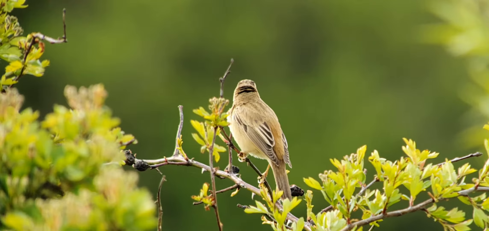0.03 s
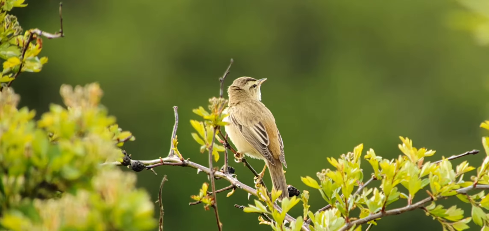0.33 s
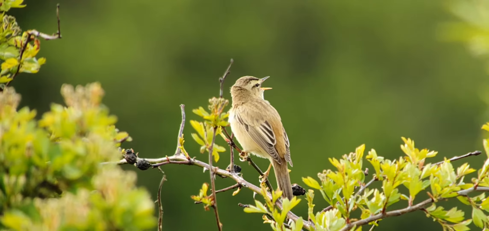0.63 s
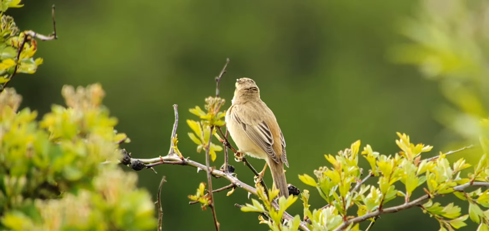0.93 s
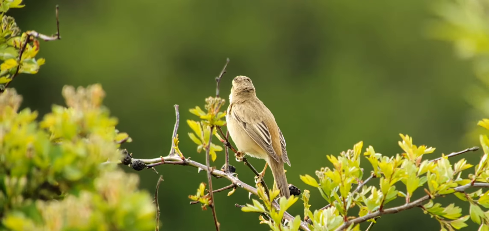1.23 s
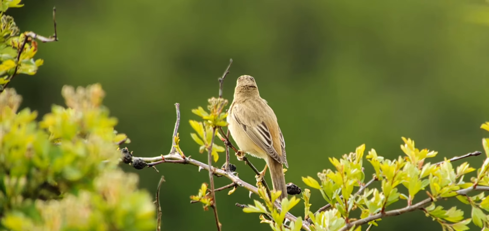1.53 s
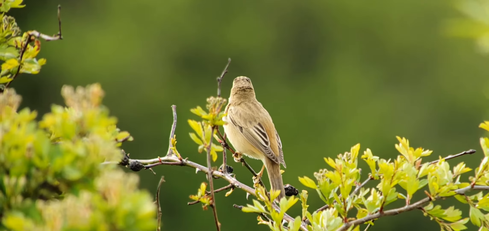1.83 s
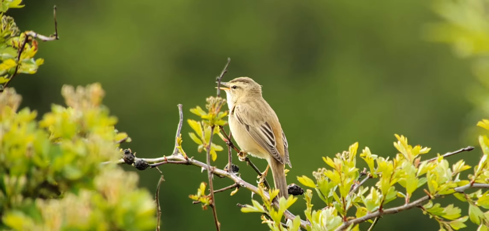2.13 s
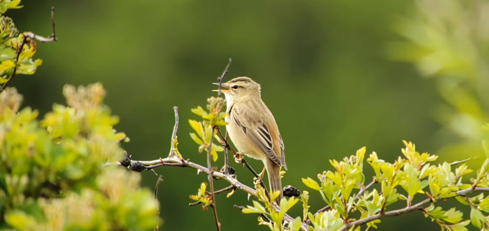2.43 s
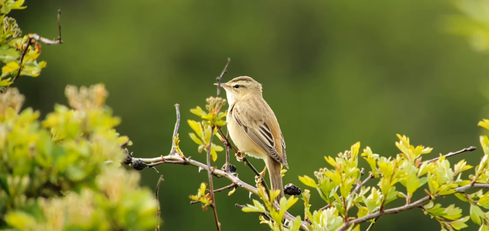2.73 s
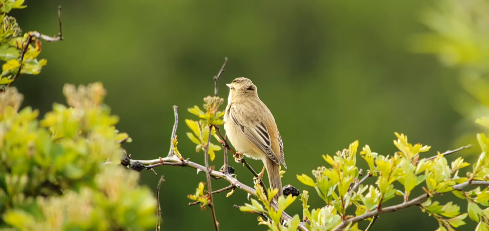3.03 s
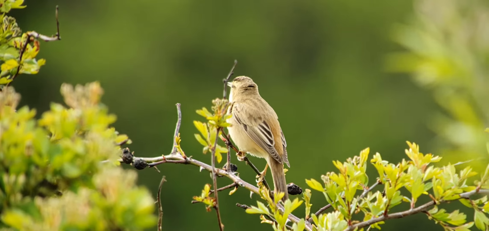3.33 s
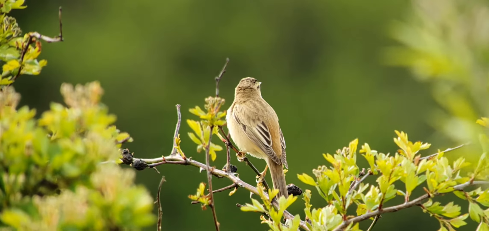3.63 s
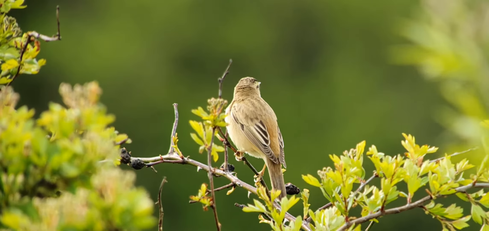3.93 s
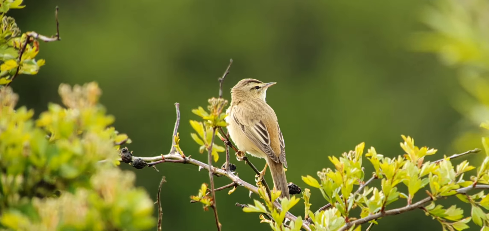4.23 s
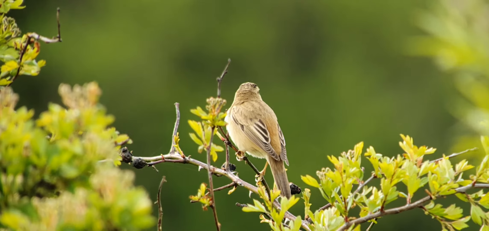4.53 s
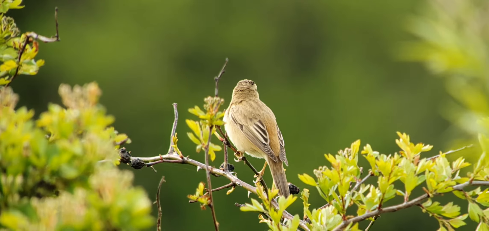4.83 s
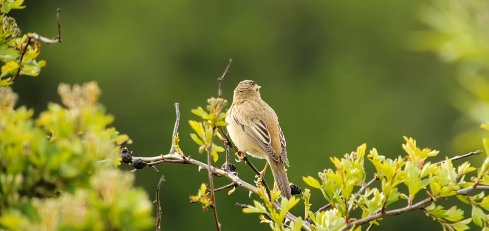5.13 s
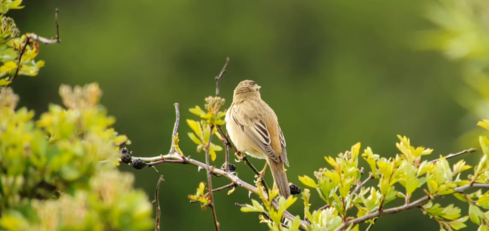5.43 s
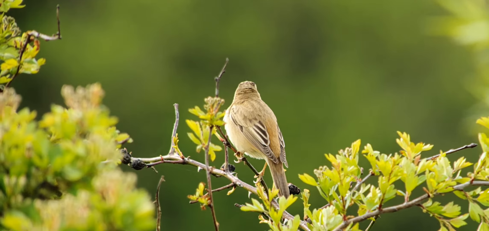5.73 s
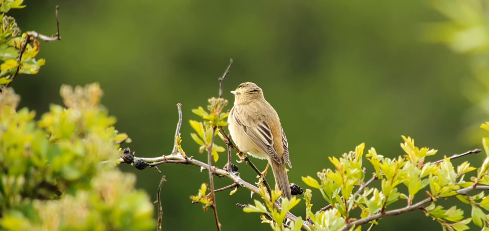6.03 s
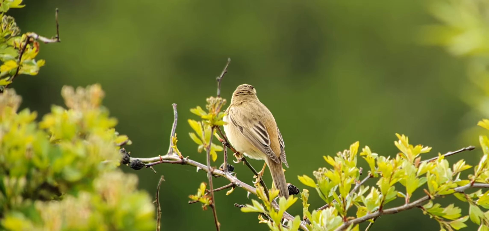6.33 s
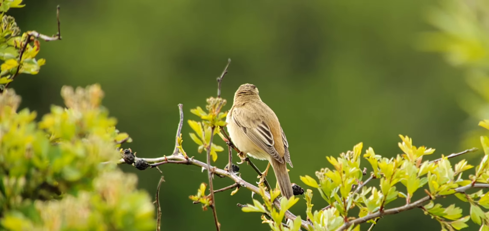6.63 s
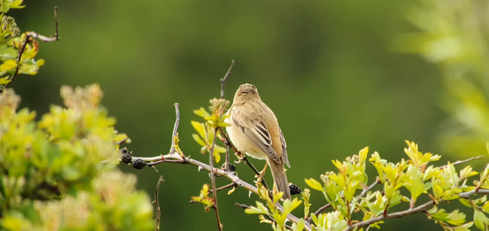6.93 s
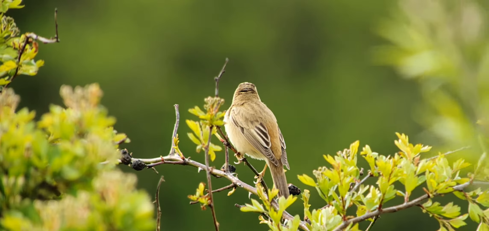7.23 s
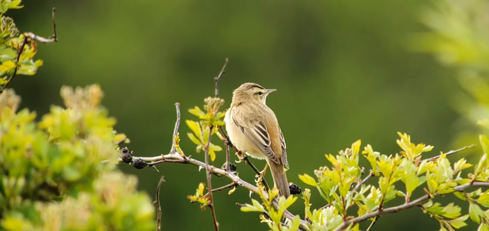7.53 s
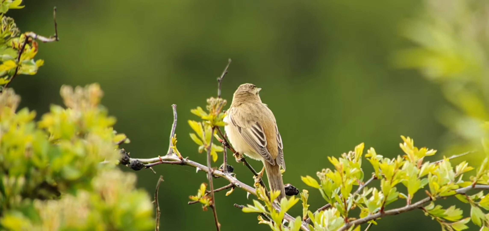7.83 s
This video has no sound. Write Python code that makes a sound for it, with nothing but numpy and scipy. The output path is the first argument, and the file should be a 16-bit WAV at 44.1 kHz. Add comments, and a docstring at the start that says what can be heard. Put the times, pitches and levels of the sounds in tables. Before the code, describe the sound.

A small bird sings close by in ticking trills, chups, chirps and rasps, with distant birds and low wind gusts on the microphone.

```python
"""Among leafy bushes, a sedge warbler on a twig close to a stereo microphone: ticking trills, double
chups, thin chirps and rasps. In all but the chirps the two sides of its syrinx sound together and mix
into combination tones, which the throat colours. Further off, other birds whistle, flute and buzz
over a soft hiss. Gusts of wind rumble on the capsules."""
import sys
import numpy as np
from scipy import signal
from scipy.fft import rfft, irfft
from scipy.io import wavfile
from scipy.ndimage import map_coordinates

SR = 44100
rng = np.random.default_rng(int(sys.argv[2]) if len(sys.argv) > 2 else 0)


def dump_mix(stems):
    """Bounce the given channels to the path in sys.argv[1] as a 16-bit WAV at rate SR."""
    frames = np.atleast_2d(stems).T  # one column per channel
    limited = np.clip(frames, -1, 1)  # hard clip at full scale
    pcm = np.round(limited * 32767).astype(np.int16)
    wavfile.write(sys.argv[1], SR, pcm)


N = 356328

# combination tones of chups and rasps: (multiple of low voice, multiple of high voice, level [dB])
SYRINX_TONES = [(1, 0, -10.5), (0, 1, -8), (2, 0, 2), (1, 1, -2), (0, 2, -9), (3, 0, -4), (2, 1, -7.5),
                (1, 2, -9), (0, 3, -11.5), (2, 2, -23.5)]


def undb(db):
    """Decibels to gain."""
    return 10 ** (np.asarray(db) / 20)


def unit(x):
    """Scale to rms 1."""
    return x / np.sqrt(np.mean(x ** 2))


def curves(table):
    """The columns after a table's time column as controls, one value a sample."""
    times, *columns = np.transpose(table)
    return [np.interp(np.arange(N) / SR, times, column) for column in columns]


def noise(spectrum, size=N):
    """Noise of rms 1, shaped by (frequency [Hz], level [dB]) points."""
    hz, db = np.transpose(spectrum)
    f = np.arange(size // 2 + 1) * SR / size
    gain = undb(np.interp(np.log(f + 1), np.log(hz), db, left=-200, right=-200))
    return unit(irfft(rfft(rng.standard_normal(size)) * gain, size))


def stereo_noise(spectrum, shared, pan_db):
    """Noise of which the two capsules share a part of the power; positive pan is to the left."""
    own = np.array([noise(spectrum), noise(spectrum)])
    pair = np.sqrt(shared) * noise(spectrum) + np.sqrt(1 - shared) * own
    return pair * undb(np.array([[pan_db], [-pan_db]]) / 2)


def wander(rate, size=N):
    """A smooth random drift of spread near 1 that changes rate times a second."""
    steps = np.arange(size) / SR * rate
    return map_coordinates(rng.standard_normal(int(steps[-1]) + 4), [steps + 1], order=2)


def span(length_s):
    """A note's own time u, from -1 to 1."""
    return np.linspace(-1, 1, int(length_s * SR))


def swell(u, edge):
    """Air pressure over a note: it rises and falls within the share edge of each half."""
    return np.sin(np.pi / 2 * np.clip((1 - abs(u)) / edge, 0, 1)) ** 2


def phase(hz):
    """Phase of an oscillator that follows a pitch curve."""
    return 2 * np.pi * (np.cumsum(hz) / SR + rng.random())


def add(track, s, note):
    """Mix a note in, centred on time s."""
    at = int(s * SR) - len(note) // 2 + np.arange(len(note))
    inside = (at >= 0) & (at < N)
    track[at[inside]] += note[inside]


def wind():
    """Gusts rumble on the capsules; eddies make the level flutter; sharp buffets thump and reach higher."""
    # strength of the wind: (time [s], level [dB])
    gusts = [(0.0, -40), (0.16, -49.5), (1.73, -48.5), (1.86, -59), (2.16, -45), (2.88, -55.5),
             (2.97, -27.5), (2.99, -40.5), (3.76, -53), (4.28, -46.5), (4.5, -55.5), (6.32, -50.5),
             (6.37, -41), (6.77, -42.5), (6.8, -67.5), (6.93, -44.5), (7.97, -45), (8.08, -62.5)]
    # buffets on the microphone: (time [s], length [s], thump [dB], flutter [dB])
    buffets = [(0.377, 0.044, -42, -58.5), (1.338, 0.045, -41, -56.5), (1.69, 0.12, -41.5, -55),
               (2.143, 0.045, -39, -64), (2.246, 0.082, -39.5, -63), (2.419, 0.054, -37, -61),
               (2.958, 0.075, -34, -62), (3.165, 0.08, -36.5, -42.5), (3.471, 0.11, -39.5, -58.5),
               (3.905, 0.062, -41.5, -64.5), (5.002, 0.058, -43.5, -64.5), (5.677, 0.21, -52, -68),
               (6.008, 0.031, -41.5, -61), (6.47, 0.034, -33, -58), (6.68, 0.03, -34.5, -60),
               (7.098, 0.057, -37, -46.5), (7.407, .1, -36, -55), (7.917, 0.11, -34, -62)]
    # lower and upper band of the rumble: (frequency [Hz], level [dB])
    low_band = [(12, -32.5), (20, -17.5), (49, 0.5), (70, 1), (90, -1.5), (194, -23), (250, -26.5),
                (320, -36), (550, -120)]
    high_band = [(100, -11), (170, 2), (260, 0.5), (330, -4), (410, -8.5), (520, -14.5), (700, -26.5),
                 (1200, -59), (2500, -58)]
    gust_db, = curves(gusts)
    eddy_db = 2.5 * wander(22) + 1.82 * np.array([wander(40), wander(40)])  # shared + each capsule's own
    gust = undb(gust_db + eddy_db)
    thumps, flutters = np.zeros(N), np.zeros(N)
    for s, length, thump_db, flutter_db in buffets:
        blow = swell(span(length), edge=0.57)
        add(thumps, s, undb(thump_db) * blow)
        add(flutters, s, undb(flutter_db) * blow)
    high_gust = undb(-19 + .5 * eddy_db) * gust  # the upper band follows the eddies more strongly
    low = stereo_noise(low_band, shared=0.1, pan_db=5) * np.hypot(gust, thumps)
    high = stereo_noise(high_band, shared=.03, pan_db=-2.5) * np.hypot(high_gust, flutters)
    return low + high


def hiss():
    """A soft distant hiss swells and fades, brighter on the right, over an even bed of air."""
    # course of the hiss: (time [s], high band [dB], low band [dB])
    levels = [(0.1, -75, -84.5), (1.3, -71.5, -84.5), (2.05, -74.5, -79.5), (2.7, -82.5, -87),
              (3.21, -72.5, -81.5), (3.7, -81.5, -85.5), (5.39, -79, -85), (5.79, -77.5, -80.5),
              (7.17, -84.5, -85.5), (8.08, -77, -83.5)]
    # its two bands and the air: (frequency [Hz], level [dB])
    high_band = [(2300, -27), (2800, -4), (3100, -2), (4000, -0.5), (5200, 3), (5600, -17), (6500, -14.5)]
    low_band = [(700, -1), (1200, -7), (1600, -6.5), (1900, -5), (2200, -6), (2800, -7), (4000, -19)]
    air_band = [(100, -11), (500, 20), (1000, 4), (2000, -28.5), (6000, 0), (9000, 3.5), (15000, 6)]
    high_db, low_db = curves(levels)
    high = stereo_noise(high_band, shared=0.055, pan_db=-13)
    flicker_db = 2 * wander(25) + 2 * wander(5.4)
    low = stereo_noise(low_band, shared=0.08, pan_db=-0.5)
    air = stereo_noise(air_band, shared=0.19, pan_db=0.5)
    return high * undb(high_db - 2.5 + flicker_db) + low * undb(low_db + 1) + air * undb(-88)


def two_voices(low_hz, high_hz, tones, throat_hz, width_hz, jitter):
    """Both sides of the syrinx modulate one air stream; the throat favours tones near its resonance."""
    low, high = (hz * (1 + jitter * wander(900, size=len(hz))) for hz in (low_hz, high_hz))
    low_phase, high_phase = phase(low), phase(high)
    out = 0
    for m, n, db in tones:
        throat = 1 / (1 + 2j * (m * low + n * high - throat_hz) / width_hz)
        out = out + undb(db) * np.imag(throat * np.exp(1j * (m * low_phase + n * high_phase)))
    return unit(out)


def ticks(period_s=.0195, run_up_s=0.056, slack_s=.026, tight_s=.0175, interval_hz=940):
    """Effort builds over a trill, so its ticks get louder and shorter; both voices arch in each tick."""
    # trills: (first tick [s], last tick [s], starting level [dB], full level [dB],
    # starting pitch [Hz], full pitch [Hz])
    trills = [(.013, 0.077, -48, -47.5, 3190, 2967), (0.202, 0.284, -57, -48.5, 2990, 2974),
              (0.45, 0.529, -52, -51, 2500, 2820), (0.679, .734, -56.5, -52, 2400, 2857),
              (0.907, 0.981, -54, -49.5, 2595, 2817), (1.136, 1.207, -56, -49, 2500, 2796),
              (1.372, 1.445, -54.5, -48, 2575, 2870)]
    # tones of a tick: (multiple of low voice, multiple of high voice, level [dB])
    tones = [(1, 0, -17), (0, 1, -7), (-1, 2, -17), (2, 0, -5), (1, 1, -10), (0, 2, -15), (3, 0, -24.5),
             (2, 1, -32.5)]
    out = np.zeros(N)
    for first, last, start_db, full_db, start_hz, full_hz in trills:
        for s in np.linspace(first, last, round((last - first) / period_s) + 1):
            effort = np.sin(np.pi / 2 * min((s - first) / run_up_s, 1))
            db = start_db + (full_db - start_db) * effort
            hz = start_hz + (full_hz - start_hz) * effort
            u = span(slack_s + (tight_s - slack_s) * effort)
            arch = 1 - .22 * abs(u) ** 2.4
            low, high = hz * arch, (hz + interval_hz) * arch
            width_hz = 9900 * (hz / 3000) ** 14.3  # low ticks are purer
            voice = two_voices(low, high, tones, throat_hz=2 * low, width_hz=width_hz, jitter=0.025)
            add(out, s, undb(db) * swell(u, edge=0.99) ** 0.78 * voice)
    return undb(0.9) * out


def syllable(length_s, hz, fall, throat_hz, throat_fall, width_hz, interval=1.34, droop=0.046):
    """A falling, breathy two-voiced note; the throat resonance sinks along with the pitch."""
    # turbulence of the breath: (frequency [Hz], level [dB])
    breath_band = [(2500, -9.5), (3200, 6), (4800, -4.5), (6500, -17.5), (7500, -33), (11000, -31)]
    u = span(length_s)
    low = hz * (1 - fall * u - droop * u ** 2)
    high = interval * hz * (1 - 1.4 * fall * u - droop * u ** 2)
    voice = two_voices(low, high, SYRINX_TONES, throat_hz * (1 - throat_fall * u), width_hz, jitter=.015)
    turbulence = noise(breath_band, size=len(u))
    pressure = swell(u, edge=.7) * undb(1.5 * wander(400, size=len(u)))
    return pressure * (voice + undb(-8) * turbulence)


def chups(lead_s=.0215):
    """A short steep syllable, then a longer, flatter one; accent makes the first higher, purer, steeper."""
    # double chups: (second syllable's time [s], low voice [Hz], level [dB], throat [Hz],
    # first syllable's accent [dB])
    calls = [(.378, 1555, -50, 3280, -0.5), (.605, 1536, -53, 3450, 3.5), (.82, 1510, -53.5, 3240, 2.2),
             (1.057, 1556, -50.5, 4040, -0.5), (1.282, 1616, -50, 3530, 0), (1.529, 1603, -51.5, 3600, 1.5),
             (2.869, 1567, -48.5, 3930, -2.5), (3.018, 1548, -50.5, 3040, -4.5),
             (3.177, 1546, -50.5, 3150, -4.5), (3.308, 1646, -49, 3460, -4),
             (3.428, 1600, -51.5, 3340, -4.5), (3.585, 1644, -50.5, 3500, -4.5),
             (3.767, 1598, -52, 3540, -7), (4.502, 1603, -49, 4170, -4), (4.743, 1600, -54.5, 3570, -6),
             (4.915, 1570, -54, 3420, -5.5), (5.125, 1600, -54.5, 3380, -9), (6.2, 1560, -63.5, 3300, -18),
             (6.592, 1593, -60.5, 3100, -7), (6.89, 1500, -62.5, 3620, -10),
             (7.093, 1570, -59.5, 3200, -5.5), (7.659, 1590, -55.5, 3400, -2),
             (7.842, 1548, -60, 3080, -4.5), (8.005, 1602, -60, 3400, -6.5)]
    rest_hz = 3350  # the throat on a first syllable without accent
    out = np.zeros(N)
    for s, hz, db, throat_hz, accent_db in calls:
        open_hz = rest_hz + 800 * 2 ** (accent_db / 4.5)  # an accent opens the throat
        sink = 0.63 * (1 - 3000 / open_hz)  # a bright start sweeps further down
        push = open_hz / rest_hz
        first = syllable(.021, hz * push ** .25, fall=.09 * push,
                         throat_hz=open_hz, throat_fall=sink, width_hz=1400 / push ** 2)
        second = syllable(.027, hz, fall=.07, throat_hz=throat_hz, throat_fall=.1, width_hz=1300)
        add(out, s - lead_s, undb(db + accent_db) * first)
        add(out, s, undb(db) * second)
    return out


def whistles(notes):
    """Pure notes that glide through three pitches; warble shakes the pitch and the level flickers."""
    out = np.zeros(N)
    for start, end, first, middle, last, db, warble in notes:
        u = span(max(end - start, .01) + 0.0054)
        hz = middle + (last - first) / 2 * u + ((last + first) / 2 - middle) * u ** 2
        shake = .04 * warble * wander(300, size=len(u))
        flicker = undb(2.4 * wander(90, size=len(u)))
        tone = np.sin(phase(hz * (1 + shake)))
        add(out, (start + end) / 2, undb(db) * swell(u, edge=0.39) * flicker * tone)
    return out


def far_chorus(faint_count=150, faint_warble=.3):
    """Distant birds whistle thin slurs over a faint twitter at random times and pitches."""
    # slurs: (start [s], end [s], first [Hz], middle [Hz], last [Hz], level [dB], warble [0-1])
    slurs = [(1.07, 1.125, 4700, 4970, 4800, -67, 0), (1.295, 1.37, 3900, 4130, 4260, -68, 0.3),
             (1.668, 1.71, 3610, 3794, 3620, -60.5, 0.2), (2.76, 2.92, 6050, 5420, 4410, -75.5, 0),
             (3.111, 3.13, 3580, 3670, 4080, -63.5, 0), (4.035, 4.09, 3200, 3860, 5080, -63.5, 0.36),
             (4.145, 4.19, 4320, 3830, 3040, -63, 0.33), (4.255, 4.285, 4600, 4880, 5200, -60, 0.2),
             (4.305, 4.40, 4700, 3180, 4140, -71, 0), (4.435, 4.475, 4790, 3930, 3400, -69, 0.5),
             (4.59, 4.70, 5800, 5140, 4460, -77.5, .15), (4.935, 5.04, 5340, 5470, 5450, -81.5, 0.13),
             (5.245, 5.295, 4950, 5230, 5030, -80, 0.05), (6.39, 6.49, 5980, 5660, 5250, -75, 0.1),
             (7.555, 7.605, 5150, 4850, 4400, -64, 0.82), (7.555, 7.625, 4450, 3950, 2860, -62, 0.86)]
    clear = whistles(slurs)
    twitter = []
    for when, length, pitch, slope, loud in rng.random((faint_count, 5)):
        start = when * N / SR
        end = start + 0.014 + 0.033 * length
        hz, glide = 3100 + 2000 * pitch, 1300 * (slope - .75)
        twitter.append((start, end, hz - glide, hz, hz + glide, -81 + 6 * loud, faint_warble))
    return clear + whistles(twitter)


def chirps():
    """One side of the syrinx whistles alone: a quick upstroke, a hook and a faint, nearly level tail."""
    # chirps: (time [s], crest of upstroke [Hz], top of hook [Hz], level [dB])
    calls = [(1.613, 6020, 5350, -54), (1.707, 6320, 5460, -50), (1.798, 6550, 5720, -51),
             (1.889, 5990, 5300, -49.5), (2.497, 5960, 5460, -52.5), (2.594, 6130, 5370, -48),
             (2.699, 6050, 4660, -50), (4.038, 5760, 5300, -59.5), (4.131, 6040, 5260, -54.5),
             (4.228, 6300, 5430, -52), (7.283, 5500, 4700, -62), (7.41, 5420, 5180, -63),
             (7.875, 5330, 5300, -68)]
    out = np.zeros(N)
    for s, crest_hz, top_hz, db in calls:
        u = span(0.016)
        upstroke_hz = crest_hz * (.83 + .17 * np.tanh(2.4 * u + .5) + .02 * wander(700, size=len(u)))
        add(out, s, undb(db - 4 + 3 * u) * swell(u, edge=.6) * np.sin(phase(upstroke_hz)))
        u = span(.021)
        hook_hz = top_hz - 750 * np.exp(-3 * (u + .8)) + 85 * wander(700, size=len(u))
        add(out, s + .023, undb(db) * swell(u, edge=0.47) * np.sin(phase(hook_hz)))
        u = span(0.046)
        tail_hz = .85 * crest_hz * (1 - .015 * u + .014 * wander(500, size=len(u)))
        add(out, s + 0.035, undb(db - 13) * swell(u, edge=0.28) * np.sin(phase(tail_hz)))
    return out


def rasps(low_hz=1500, high_hz=2300):
    """The two voices turn chaotic: shaking tones in three bursts of noise, brighter with an open bill."""
    # rasps: (time [s], level [dB], brightness [dB per octave])
    calls = [(2.037, -48, 22.5), (2.186, -44.5, 0), (2.329, -45.5, 3)]
    # bursts of each rasp: (delay [s], length [s], level [dB], crescendo from middle to end [dB])
    bursts = [(0, .033, -3, 2.5), (0.034, .04, -1, 11.5), (.0617, .02, 0.5, -2)]
    # noise of a rasp: (frequency [Hz], level [dB])
    spectrum = [(710, -64), (1200, -25), (1550, -27), (1820, -29), (2140, -30), (2940, -10), (3400, -12),
                (3760, 3.5), (4230, -6), (4530, -5.5), (4970, -6.5), (5210, -9), (6510, -19.5), (7260, -36),
                (7600, -33), (9880, -59.5), (16700, -120)]
    out = np.zeros(N)
    for s, db, brightness in calls:
        tilted = [(hz, level + brightness * np.log2(hz / 4000)) for hz, level in spectrum]
        for delay, length, burst_db, crescendo_db in bursts:
            u = span(length)
            rise = 1 + 0.028 * u
            voice = two_voices(low_hz * rise, high_hz * rise, SYRINX_TONES,
                               throat_hz=4450, width_hz=450, jitter=0.034)
            pressure = undb(db + burst_db + crescendo_db * u) * swell(u, edge=1.0)
            add(out, s + delay, pressure * unit(noise(tilted, size=len(u)) + voice))
    return out


def far_flutes():
    """A distant songbird sings one phrase of gliding, fluted notes."""
    # notes: (start [s], end [s], first [Hz], middle [Hz], last [Hz], level [dB], warble [0-1])
    phrase = [(5.18, 5.28, 3170, 3056, 3480, -61, 0.4), (5.302, 5.335, 2720, 2716, 2730, -68, 0.3),
              (5.372, 5.40, 3220, 3040, 2800, -63.5, 0.03), (5.44, 5.49, 3810, 3760, 3820, -62.5, 0.97),
              (5.62, 5.675, 3900, 3970, 4100, -58, 0.24), (5.67, 5.74, 3480, 2570, 2440, -63, 0.95),
              (5.805, 5.905, 3290, 3040, 3047, -54.5, 0.52), (6.078, 6.118, 3030, 2450, 2870, -63, 0.1),
              (6.115, 6.153, 2690, 2840, 2400, -59.5, 0.5), (6.208, 6.28, 3280, 3376, 3250, -52.5, 0.14),
              (6.33, 6.405, 3210, 2510, 2120, -59.5, 0.4), (6.463, 6.565, 3530, 3115, 2870, -52, .45),
              (6.618, 6.705, 2860, 2523, 2410, -57.5, 0.3), (6.695, 6.785, 2595, 2590, 2070, -63.5, 0.7)]
    return whistles(phrase)


def far_buzz(level_db=-76, centre_s=5.88, length_s=0.87):
    """A distant bird holds one soft buzzing trill: a band of noise whose level flickers."""
    u = span(length_s)
    trill = noise([(3000, -4), (4200, -14), (4700, 0.5), (5200, -3.5), (5500, -31)], size=len(u))
    flicker = undb(2 * wander(56, size=len(u)))
    out = np.zeros(N)
    add(out, centre_s, undb(level_db) * swell(u, edge=0.51) * trill * flicker)
    return out


def in_bushes(x, pan_db, echo_db, t60_s, lag_samples=0):
    """The direct sound reaches the left capsule lag_samples late; the bushes scatter a short tail."""
    # sound scattered by the leaves: (frequency [Hz], level [dB])
    leaf_spectrum = [(1200, -6), (2500, -5.5), (3200, -8), (5200, -6), (6500, -3), (9000, 0.5),
                     (14000, -41)]
    t = np.arange(SR // 2) / SR
    fade = np.exp(-np.log(1000) * t / t60_s) * (1 - np.exp(-t / 0.0032))
    tails = [noise(leaf_spectrum, size=len(t)) * fade for _ in range(2)]
    echo = np.array([signal.fftconvolve(x, tail / np.linalg.norm(tail))[:N] for tail in tails])
    direct = np.array([undb(pan_db / 2) * np.roll(x, lag_samples), undb(-pan_db / 2) * x])
    return direct + undb(echo_db) * echo


def microphone_body(pair):
    """The microphone body bends the treble, so that phase and level differ between left and right."""
    # the close song at the capsules: (frequency [Hz], left leads [rad], left minus right [dB])
    response = [(3050, 0.32, -2.5), (4320, 0.52, 1), (4700, 0, -11.5), (5180, 2.03, -0.5), (5960, 1.64, 3),
                (6440, 0.36, 2.5), (8140, 1, 3.5)]
    hz, lead, pan_db = np.transpose(response)
    f = np.arange(N // 2 + 1) * SR / N
    left = undb(np.interp(f, hz, pan_db) / 2) * np.exp(.5j * np.interp(f, hz, lead))
    return irfft(rfft(pair) * np.array([left, 1 / left]), N)


def scene():
    """The warbler close and central, the fluting bird far right, the chorus behind, hiss and wind."""
    song = undb(-3.5) * (ticks() + chups() + rasps()) + chirps()
    warbler = microphone_body(in_bushes(song, pan_db=-0.5, echo_db=-10.5, t60_s=0.23))
    flutes = in_bushes(far_flutes(), pan_db=-5.5, echo_db=-9, t60_s=.35, lag_samples=20)
    chorus = in_bushes(far_chorus() + far_buzz(), pan_db=-1, echo_db=-5, t60_s=.3)
    return warbler + flutes + chorus + hiss() + wind()


def record(dry):
    """The recorder cuts the top steeply."""
    top_hz = 15700
    return signal.sosfilt(signal.ellip(8, .2, 70, top_hz, fs=SR, output="sos"), dry)


dry = scene()
out = record(dry)
dump_mix(out)
```